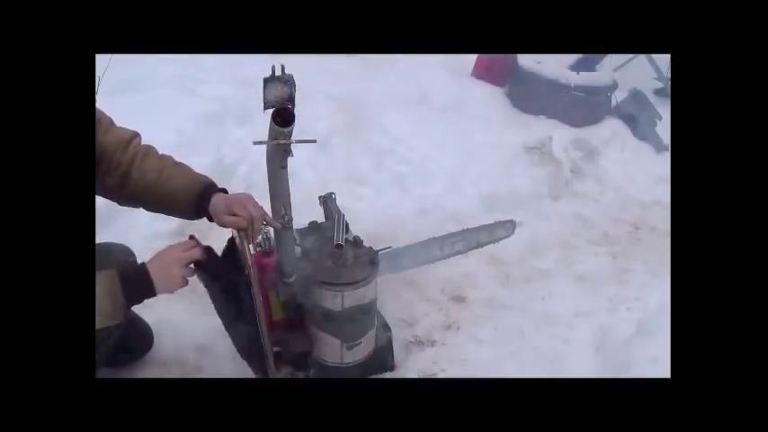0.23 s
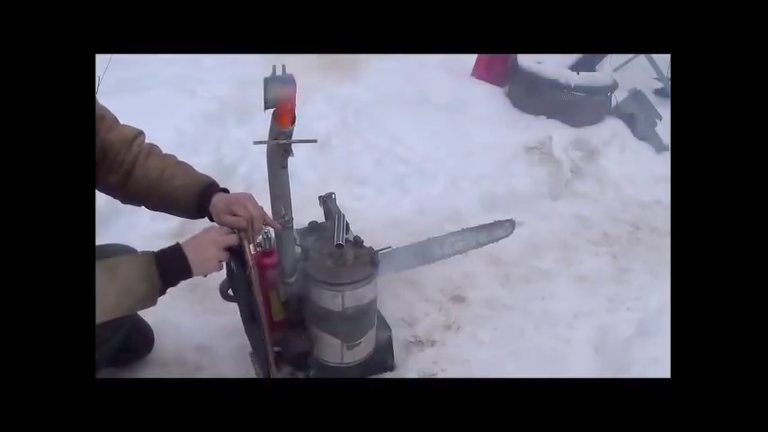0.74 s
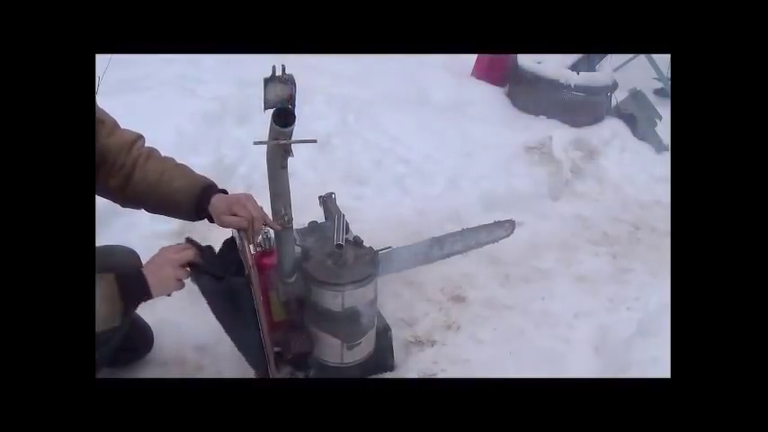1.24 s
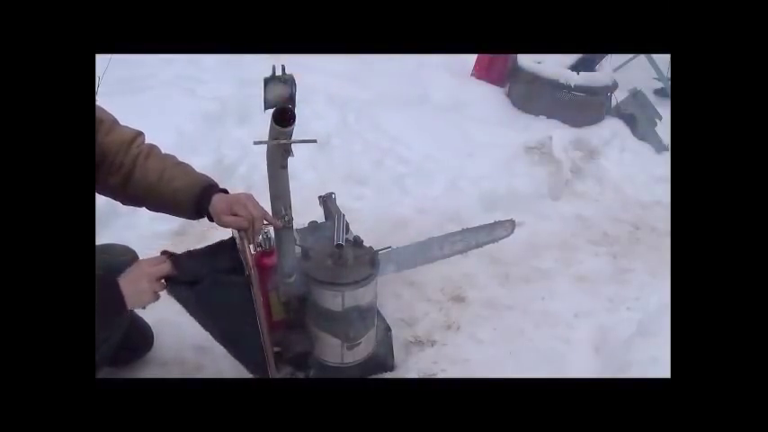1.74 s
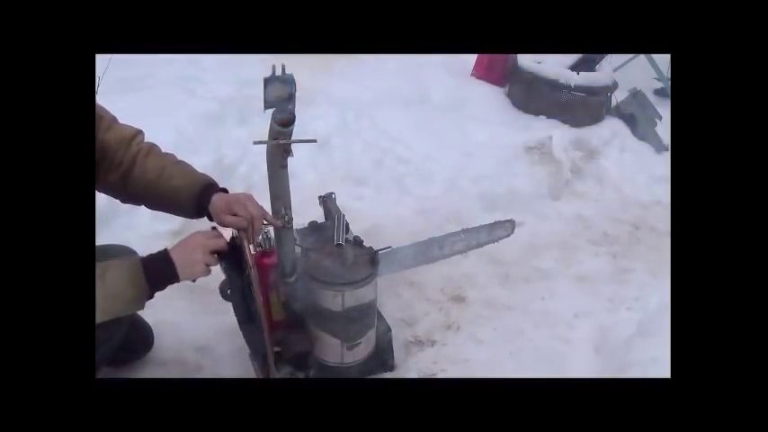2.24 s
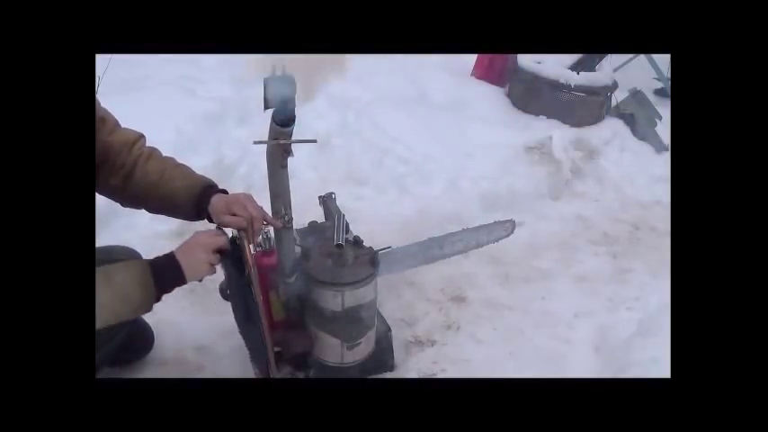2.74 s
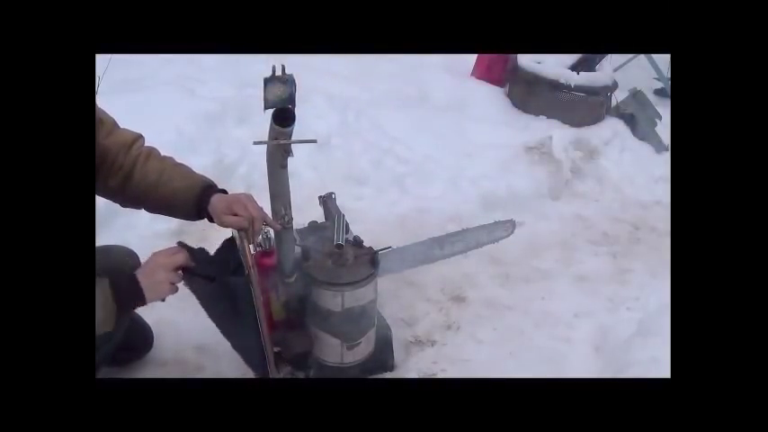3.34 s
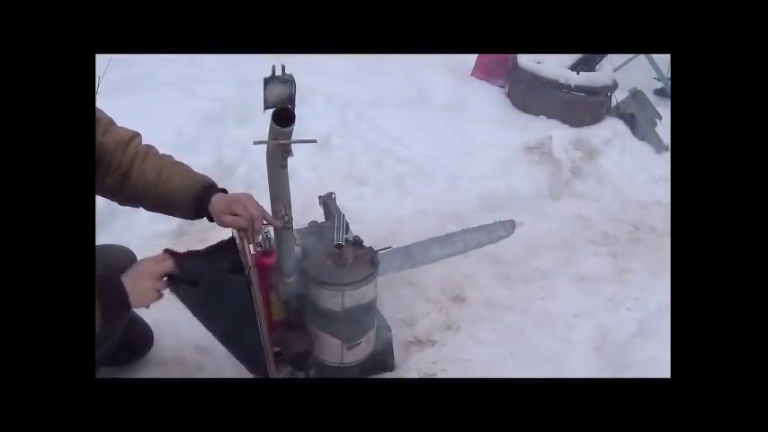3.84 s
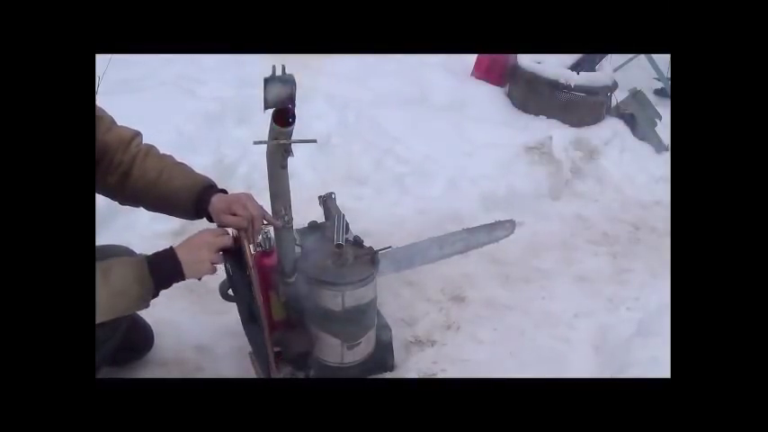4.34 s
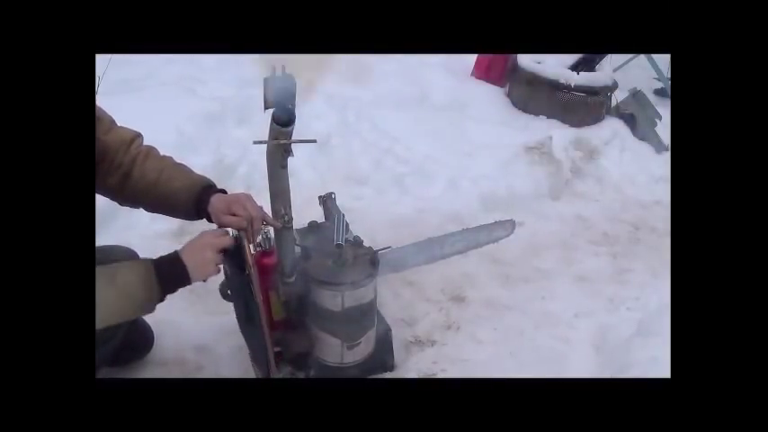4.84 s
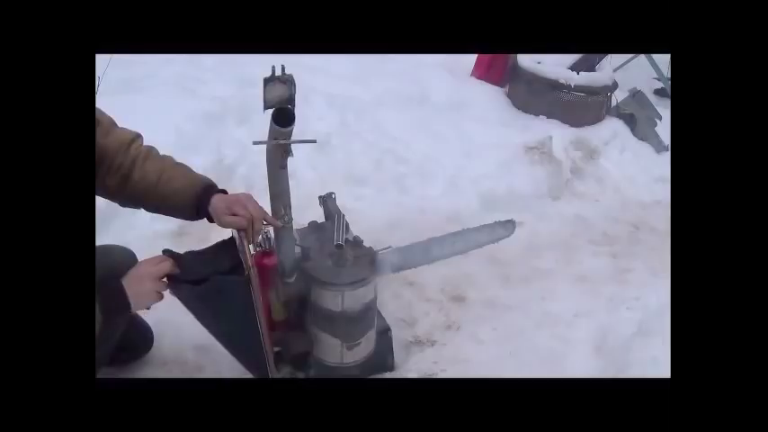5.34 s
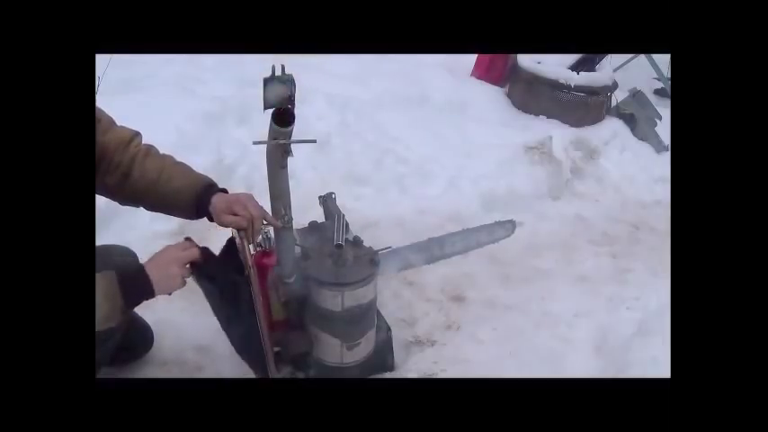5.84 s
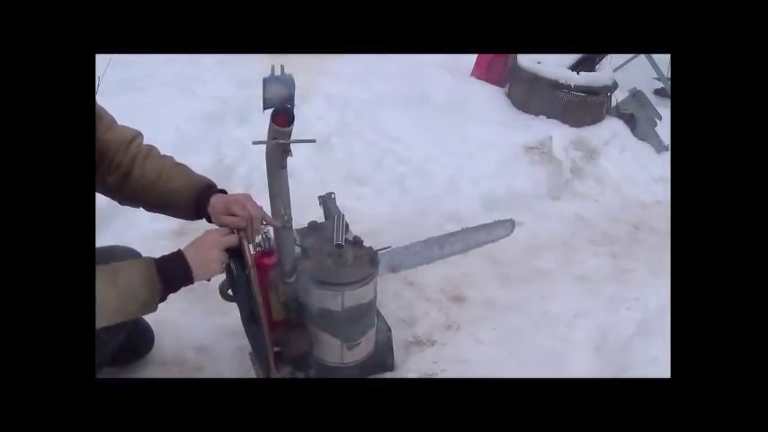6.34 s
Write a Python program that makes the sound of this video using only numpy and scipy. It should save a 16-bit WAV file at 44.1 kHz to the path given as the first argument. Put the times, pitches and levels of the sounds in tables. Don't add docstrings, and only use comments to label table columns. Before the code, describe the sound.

Ten forceful air blasts at a steady pace, each a sharp jet hiss with a hollow pipe roar and low drum rumble that breaks off abruptly. Between them come quieter bellows mechanics: valve flap patter, whistling intake, dry fold snap, dull cloth flops, loose linkage ticks, wooden clacks and knocks. Heard very close, in open snowy air with faint fire hush and little echo.

```python
import sys
import numpy as np
from scipy import signal
from scipy.fft import rfft, irfft, next_fast_len
from scipy.io import wavfile

SR = 44100
rng = np.random.default_rng(int(sys.argv[2]) if len(sys.argv) > 2 else 0)


def nominal_scale(level):
    x = np.asarray(level, float) / 20
    return 10 ** x


def waveform_to_disk(signal):
    frames = np.transpose(np.atleast_2d(signal))
    scaled = np.clip(frames, -1, 1) * 32767
    samples = np.round(scaled).astype(np.int16)
    wavfile.write(sys.argv[1], SR, samples)


N = 290044


def rms_one(x):
    return x / np.sqrt(np.mean(x ** 2) + 1e-20)


def drift(rate_hz):
    pole = np.exp(-2 * np.pi * rate_hz / SR)
    settle = 8000
    wander = signal.lfilter([1], [1, -2 * pole, pole * pole], rng.standard_normal(N + settle))
    return rms_one(wander[settle:])


def air(peaks, flutter_db, flutter_hz):
    noise = rng.standard_normal(N) * nominal_scale(flutter_db * drift(flutter_hz))
    out = 0
    for k, (hz, width_hz, db) in enumerate(peaks):
        pole = np.exp(-np.pi * width_hz / SR)
        poles = [1, -2 * pole * np.cos(2 * np.pi * hz / SR), pole * pole]
        zeros = np.array([1, 0, -1]) * (1 - pole * pole) / 2
        sign = (-1) ** k
        out = out + sign * nominal_scale(db) * signal.lfilter(zeros, poles, noise)
    return rms_one(out)


def linger(gain, fade_s):
    fade = np.exp(-1 / (fade_s * SR))
    return signal.lfilter([1 - fade], [1, -fade], gain)


def stroke(start_s, length_s, force_db, law, opening_db_per_s, later=0):
    peak_db, swell_db, crest, cutoff_db_per_s = law[:4]
    since = np.arange(N) / SR - start_s[:, None]
    held = np.clip(since, 0, length_s[:, None])
    share = held / length_s[:, None]
    db = peak_db + force_db[:, None] - swell_db * (share / (crest + later) - 1) ** 2
    slope = np.where(since < 0, opening_db_per_s, cutoff_db_per_s)
    return nominal_scale(db - slope * np.abs(since - held)).sum(axis=0)


# stop_s, length_s, force_db, sigh_db, crest_later (share of stroke)
PUSHES = [(0.033, 0.21, -2, -7, .01), (0.734, 0.15, -1.5, -3, 0.0049), (1.427, 0.16, -2.5, -1, 0.046),
          (2.129, 0.16, -1.34, -7.5, -0.023), (2.836, .170, -0.16, 1.5, 0.013),
          (3.55, 0.17, -0.7, 2, -0.0098), (4.249, 0.16, -0.1, -5.5, 0.02), (4.928, .160, -0.45, 4.5, 0.021),
          (5.626, .150, -1.35, 2.2, -0.018), (6.328, 0.15, -0.2, -1.5, 0.026)]
EMPTIED_S = [.085, 0.779, 1.466, 2.192, 2.885, 3.599, 4.303, 4.97, 5.668, 6.391]


def blast(law):
    rise_db_per_s, fall_db_per_s, opening_db_per_s = 509, 524, 887
    stop_s, length_s, force_db, sigh_db, later = np.transpose(PUSHES)
    since = np.arange(N) / SR - np.array(EMPTIED_S)[:, None]
    slope = np.where(since < 0, rise_db_per_s, fall_db_per_s)
    sigh = nominal_scale(law[4] + sigh_db[:, None] - slope * np.abs(since))
    gain = stroke(stop_s - length_s, length_s, force_db, law, opening_db_per_s, later[:, None])
    return gain + sigh.sum(axis=0)


# pitch_hz, width_hz, level_db
JET = [(2680, 870, -2.5), (3576, 180, 3.5), (4420, 363, 4.5), (5200, 460, -23), (5850, 280, -6.5),
       (6630, 1700, -16), (8400, 1200, -17), (10350, 1510, -3), (14000, 2500, -69)]
# peak_db, swell_db, crest (share of stroke), cutoff_db_per_s, sigh_db
JET_LAW = (-20.5, 28.5, 0.706, 650, -68.5)


def jet():
    return nominal_scale(4.5) * blast(JET_LAW) * air(JET, flutter_db=1.0, flutter_hz=60.4)


# pitch_hz, width_hz, level_db
ROAR = [(690, 84, -7), (1105, 168, 0), (1443, 194, -2.5), (1594, 287, -7)]
# pitch_hz, width_hz, level_db
HOOT_SKIRT = [(257, 19, -4.5), (387, 280, -4.5), (614, 200, -7.5)]
# peak_db, swell_db, crest (share of stroke), cutoff_db_per_s, sigh_db
ROAR_LAW = (-13.5, 19, 0.61, 558, -41)


def roar():
    body = air(ROAR, flutter_db=1.5, flutter_hz=88)
    skirt = air(HOOT_SKIRT, flutter_db=4.5, flutter_hz=30)
    return blast(ROAR_LAW) * (body + nominal_scale(-10.0) * skirt)


def narrow_noise(turn, width_hz):
    return drift(width_hz) * np.cos(turn) + drift(width_hz) * np.sin(turn)


def pipe_note():
    full_hz, empty_hz, width_hz = 475, 542.5, 21
    slide_s, overtone_db = 0.0499, -7.5
    knots = np.array(EMPTIED_S)[:, None] + [-.25, -slide_s / 2, slide_s / 2, .15]
    pitches = np.tile([.95 * full_hz, full_hz, empty_hz, empty_hz], len(knots))
    hz = np.interp(np.arange(N) / SR, knots.ravel(), pitches)
    turn = 2 * np.pi * np.cumsum(hz) / SR
    first = narrow_noise(turn, width_hz)
    second = narrow_noise(2 * turn, 2 * width_hz)
    return rms_one(first + nominal_scale(overtone_db) * second)


# peak_db, swell_db, crest (share of stroke), cutoff_db_per_s, sigh_db
HOOT_LAW = (-27.5, 8, 1.1, 315, -26.5)


def hoot():
    return nominal_scale(1.5) * blast(HOOT_LAW) * pipe_note()


# pitch_hz, width_hz, level_db
DRUM = [(66.3, 41, -33), (122, 45, 17.5), (216, 154, -5)]
# peak_db, swell_db, crest (share of stroke), cutoff_db_per_s, sigh_db
DRUM_LAW = (-23.5, 8.5, 0.9, 211, -33)


def drum():
    return blast(DRUM_LAW) * air(DRUM, flutter_db=2.5, flutter_hz=27)


# pitch_hz, width_hz, level_db
AFTERGLOW = [(420, 500, 4), (1500, 1800, 1.5), (3539, 2900, -3), (7000, 4000, -20)]


def embers():
    glow = nominal_scale(-18.5) * linger(blast(JET_LAW), fade_s=0.14)
    return glow * air(AFTERGLOW, flutter_db=4.0, flutter_hz=30)


# pitch_hz, width_hz, level_db
BUFFET = [(28, 25, 0)]


def buffet():
    wind = nominal_scale(-35) * blast(DRUM_LAW) * air(BUFFET, flutter_db=3.0, flutter_hz=5)
    return wind * [[1], [-1]]


# pitch_hz, level_db
FLOOR = [(18, -52), (30, -9), (127, -5), (250, -8.5), (449, -1), (616, -2.5), (1100, -9), (1910, -11.5),
         (5450, -22.5), (10500, -26), (16000, -31)]


def winter_air():
    hz, db = np.transpose(FLOOR)
    grid = np.fft.rfftfreq(N, 1 / SR) + 1
    color = nominal_scale(np.interp(np.log(grid), np.log(hz), db))
    mid, side = irfft(rfft(rng.standard_normal((2, N))) * color, N)
    return nominal_scale(-45.5) * rms_one(mid + nominal_scale(-9.5) * side * [[1], [-1]])


# start_s (flap lifts), length_s, force_db
PULLS = [(0.212, 0.18, -3), (0.918, .188, -1), (1.6, 0.18, -1.1), (2.296, 0.19, -0.7), (3.027, 0.19, 1.5),
         (3.719, 0.17, 1), (4.418, .2, 1), (5.105, 0.19, -0.6), (5.803, 0.18, -2), (6.507, .195, -1.2)]
# pitch_hz, width_hz, level_db
VALVE = [(5250, 2100, 3.5), (10360, 1200, 12.5), (13500, 2560, -35)]
# pitch_hz, width_hz, level_db
BAG = [(290, 117, -2.5), (782, 146, 1.5), (1180, 125, 0), (1576, 320, -5.5), (2520, 260, -7.5),
       (3330, 840, -14.5)]
# peak_db, swell_db, crest (share of stroke), cutoff_db_per_s
VALVE_LAW = (-44, 2.5, .5, 233)
BAG_LAW = (-32.5, 3, 0.7, 259)
SEEP_LAW = (-49.5, 6, -6, 300)


def pull():
    lift_db_per_s, seep_s = 9000, .034
    start_s, length_s, force_db = np.transpose(PULLS)
    valve = stroke(start_s, length_s, force_db, VALVE_LAW, lift_db_per_s)
    bag = stroke(start_s, length_s, force_db, BAG_LAW, lift_db_per_s)
    leak = nominal_scale(-17.5) * linger(blast(JET_LAW), fade_s=0.13)
    stop_s, push_s, push_db = np.transpose(PUSHES)[:3]
    seep_start_s = stop_s - push_s - seep_s
    seep = stroke(seep_start_s, np.full(len(stop_s), seep_s), push_db, SEEP_LAW, lift_db_per_s)
    whistle = (valve + leak + seep) * air(VALVE, flutter_db=2.0, flutter_hz=39.84)
    return whistle + bag * air(BAG, flutter_db=1.5, flutter_hz=45.56)


def struck(hits, modes, bounces, gain_db, soft_hz, vary_db):
    s, db = np.transpose(hits)
    delay, strength = np.transpose(bounces)
    luck = rng.standard_normal((len(s), len(modes), len(delay)))
    at = ((s[:, None] + delay) * SR).astype(int)
    out = np.zeros(N)
    for k, (hz, mode_db, t60) in enumerate(modes):
        clicks = np.full(N + SR, 1e-18)
        click_db = db[:, None] + gain_db + mode_db + vary_db * luck[:, k]
        np.add.at(clicks, at, strength * nominal_scale(click_db))
        decay = nominal_scale(-60 / (t60 * SR))
        w = 2 * np.pi * hz / SR
        out += signal.lfilter([0, np.sin(w)], [1, -2 * decay * np.cos(w), decay * decay], clicks[:N])
    soften = signal.butter(2, [130, soft_hz], "band", fs=SR, output="sos")
    return signal.sosfilt(soften, out)


def rattle(s, db, peaks, rise_s, t60):
    t = np.arange(SR // 20) / SR
    kicks = np.zeros(N)
    kicks[(s * SR).astype(int)] = nominal_scale(db)
    shape = (1 - np.exp(-t / rise_s)) * nominal_scale(-60 * t / t60)
    return signal.fftconvolve(kicks, shape)[:N] * air(peaks, flutter_db=3.0, flutter_hz=907)


# start_s, level_db
FLAP = [(0.217, -8), (0.916, -8.5), (1.6, -9), (2.298, -4), (3.028, -5), (3.72, -4), (4.422, -7),
        (5.108, -7.5), (5.805, -9.5), (6.509, -8)]
# pitch_hz, level_db, t60_s
FLAP_MODES = [(216, -54, 0.11), (543, -5, 0.046), (579, -2.5, 0.053), (725, -3.5, 0.03), (990, 0.5, 0.011),
              (1265, -16, 0.038), (1694, -25, 0.11)]
# delay_s, strength (signed)
FLAP_BOUNCES = [(0, 0.13), (.0017, 0.72), (.0052, 0.41), (.011, -.3), (.0145, .4), (.019, 0.23),
                (.026, -.25)]


def flap():
    return struck(FLAP, FLAP_MODES, FLAP_BOUNCES, gain_db=-3.5, soft_hz=2000, vary_db=3.8)


def spit():
    s, db = np.transpose(FLAP)
    return rattle(s, db - 30.5, TICK_BODY + VALVE, rise_s=0.0012, t60=0.054)


FLOP_DB = [-26, -22, -19.5, -18.5, -20, -16, -13, -16.5, -17, -17]
# start_s, level_db
STRAY_FLOPS = [(.609, -20), (1.091, -21), (1.238, -22.5), (1.774, -24), (2.638, -18), (3.197, -18.5),
               (3.34, -22), (3.359, -26), (3.891, -24), (4.605, -24), (4.684, -21.5), (4.73, -22.5),
               (5.444, -22), (6.14, -27)]
# pitch_hz, level_db, t60_s
THUD_MODES = [(181, -4.5, 0.1), (341, 4, 0.04), (535, -17, .02)]
# delay_s, strength (signed)
THUD_BOUNCES = [
    (0, 0.81),
    (.006, -0.42),
]


def cloth_thuds():
    after_flap = [(s + .0325, db) for (s, _), db in zip(FLAP, FLOP_DB)]
    after_snap = [(s + 0.032, db - 22.5) for s, db in SNAP]
    hits = after_flap + after_snap + STRAY_FLOPS
    return struck(hits, THUD_MODES, THUD_BOUNCES, gain_db=-3.5, soft_hz=970, vary_db=5.4)


# start_s, level_db
SNAP = [(0.29, -7), (0.996, -2.5), (1.679, -5.5), (2.375, -3.5), (3.106, -1), (3.794, -2), (4.5, -2),
        (5.191, -2), (5.882, -4.5)]
# pitch_hz, level_db, t60_s
SNAP_MODES = [(239, -15, 0.074), (543, -5, 0.021), (1670, 1.5, 0.0051), (2380, 1.5, 0.0017),
              (3450, -5, 0.0018), (4480, -37, 0.0044)]
# delay_s, strength (signed)
SNAP_BOUNCES = [
    (-.0016, 0.23),
    (0, -0.52),
    (.004, .15),
]


def snap():
    return struck(SNAP, SNAP_MODES, SNAP_BOUNCES, gain_db=-3.0, soft_hz=5500, vary_db=3.94)


# start_s, level_db
STOP = [(0.422, -6.5), (1.103, -6.5), (1.789, -2.5), (2.504, -3.5), (3.214, -2.5), (3.915, -2.5),
        (4.62, -5.5), (5.323, -6), (6.004, -4.5)]
# pitch_hz, level_db, t60_s
STOP_MODES = [(200.7, -62, 0.015), (493, -6, 0.025), (760, 1, 0.025), (1000, -8, 0.013), (1965, -10, 0.018),
              (3160, -19, 0.0081)]
# delay_s, strength (signed)
STOP_BOUNCES = [
    (-.002, -0.041),
    (.001, 0.94),
    (.013, .12),
]


def end_stop():
    return struck(STOP, STOP_MODES, STOP_BOUNCES, gain_db=-5.5, soft_hz=7200, vary_db=3.52)


# start_s, body_db, sizzle_db
TICK = [(0.474, -30, -21), (0.5031, -18, -19.5), (1.1635, -32, -24), (1.1896, -17.5, -18),
        (1.8508, -28, -22), (1.879, -21, -27), (1.932, -25, -47), (2.5758, -26.5, -19), (2.6, -12.5, -15),
        (3.2994, -27, -25.5), (3.3154, -16.5, -15.5), (3.98, -32, -26), (3.9978, -22, -46),
        (4.0387, -29, -26), (4.664, -29, -22.5), (4.6896, -14, -15), (4.727, -27.5, -24),
        (5.3614, -31, -21), (5.3865, -14, -18), (6.0705, -40, -28), (6.0921, -18, -17.5)]
# start_s, sizzle_db
SETTLE = [(3.584, -9), (2.6599, -45), (3.6441, -30), (4.339, -20.5), (4.737, -32), (5.034, -21),
          (5.689, -29), (6.4107, -20)]
# pitch_hz, width_hz, level_db
TICK_BODY = [(1090, 185, 8), (2630, 1340, -4), (3460, 350, 1.5), (4640, 670, -1.5)]
TICK_SIZZLE = [(6500, 2200, -1.5), (7750, 4000, -2.5), (10470, 1170, 2), (12000, 2300, -11)]


def linkage_ticks():
    settling = [(s, db - 13, db) for s, db in SETTLE]
    s, body_db, sizzle_db = np.transpose(TICK + settling)
    body = rattle(s, body_db - 6, TICK_BODY, rise_s=0.00024, t60=0.031)
    return body + rattle(s, sizzle_db - 2, TICK_SIZZLE, rise_s=0.00036, t60=0.011)


# start_s, level_db
CLACK = [(0.525, -16), (1.199, -10.5), (1.224, -27), (1.261, -16.5), (2.614, -15), (2.627, -24),
         (2.702, -12), (3.373, -15), (3.68, -25.5), (4.759, -18), (5.407, -14), (5.422, -27), (5.473, -14),
         (5.505, -20), (6.115, -14), (0.539, -29), (6.129, -23), (1.883, -16.5), (0.581, -23), (6.175, -18)]
# pitch_hz, level_db, t60_s
CLACK_MODES = [(270, -19, 0.095), (930, -8.5, 0.027), (1610, 4, 0.0064), (2120, -1.5, 0.0043),
               (3160, -7.5, 0.0067), (4830, -18, 0.012)]
# delay_s, strength (signed)
CLACK_BOUNCES = [
    (0, 1),
    (.0011, 0.000029),
    (.004, .2),
]


def clack():
    return struck(CLACK, CLACK_MODES, CLACK_BOUNCES, gain_db=-3.5, soft_hz=5300, vary_db=1.7)


# start_s, level_db
KNOCK = [(0.588, -3.5), (1.274, -2.5), (1.299, -10), (1.965, -10), (1.978, -5), (2.677, -2), (2.7, -6),
         (3.39, -4), (3.418, -6), (4.075, -10), (4.095, -3.5), (4.777, -13), (4.789, 0), (5.481, -5),
         (5.505, -8), (6.185, -4.5), (0.611, -11), (2.002, -10), (6.208, -7.5), (4.124, -10)]
# pitch_hz, level_db, t60_s
KNOCK_MODES = [(211, -18.5, 0.16), (360, 2, 0.031), (778, 0, 0.033), (1097, 2.5, 0.024),
               (1600, 1.5, 0.0043), (2520, -10.5, 0.0085)]
# delay_s, strength (signed)
KNOCK_BOUNCES = [
    (0, 0.32),
    (.0023, 0.48),
    (.005, -.6),
    (.009, -0.29),
]


def knock():
    return struck(KNOCK, KNOCK_MODES, KNOCK_BOUNCES, gain_db=-6.5, soft_hz=3600, vary_db=3.2)


# delay_s, strength (signed)
ECHOES = [(.0031, 0.08), (.0073, -0.03), (0.012, 0.05), (.021, -0.0063), (0.034, 0.023)]


def snowbank(x):
    band = signal.butter(1, [200, 7700], "band", fs=SR, output="sos")
    dull = signal.sosfilt(band, x)
    out = np.zeros(N)
    for s, strength in ECHOES:
        delay = int(s * SR)
        out[delay:] += strength * dull[:N - delay]
    return out * [[1], [-1]]


def scene():
    push = jet() + roar() + hoot() + drum() + embers()
    contacts = flap() + spit() + cloth_thuds() + snap() + end_stop() + linkage_ticks() + clack() + knock()
    bellows = push + pull() + contacts
    return bellows + snowbank(bellows) + winter_air() + buffet()


def band_limit(x):
    return signal.sosfilt(signal.butter(12, 16540, fs=SR, output="sos"), x)


# pitch_hz, left_minus_right_db, left_lead_radians
PORTS = [(30, .2, -.2), (64, 0, -.45), (130, -.6, -.8), (500, -1.8, -.92), (1030, -1.7, -.55),
         (2050, 0, -.08), (3200, 0, 0), (6400, .6, .12), (8600, 0, 0)]


def record(dry):
    size = next_fast_len(N + 4096)
    hz, db, lead = np.transpose(PORTS)
    grid = np.log(np.fft.rfftfreq(size, 1 / SR) + 1)
    level = nominal_scale(np.interp(grid, np.log(hz), db) / 2)
    half = level * np.exp(.5j * np.interp(grid, np.log(hz), lead))
    ports = irfft(rfft(dry, size) * [half, 1 / half], size)[:, :N]
    bass_cut = signal.butter(2, 22, "high", fs=SR, output="sos")
    top_cut = signal.cheby2(8, 40, 16300, fs=SR, output="sos")
    cut = signal.sosfilt(top_cut, signal.sosfilt(bass_cut, ports))
    mix = 1.342 * np.tanh(cut / 1.28)
    return band_limit(mix)


dry = scene()
out = record(dry)
waveform_to_disk(out)
```